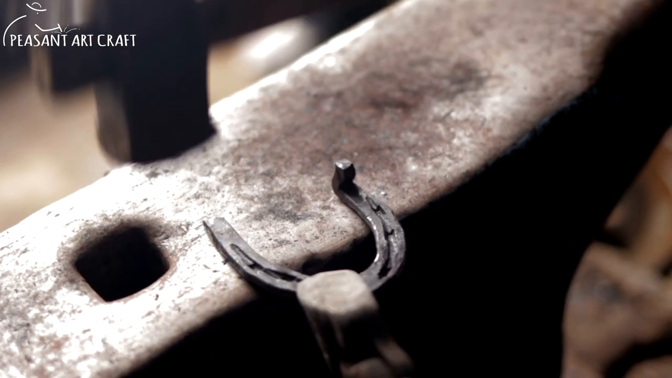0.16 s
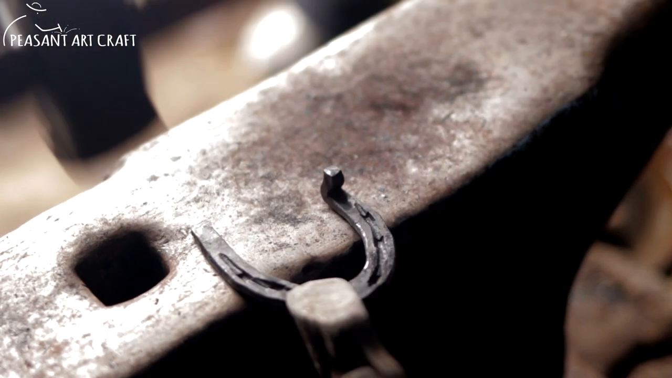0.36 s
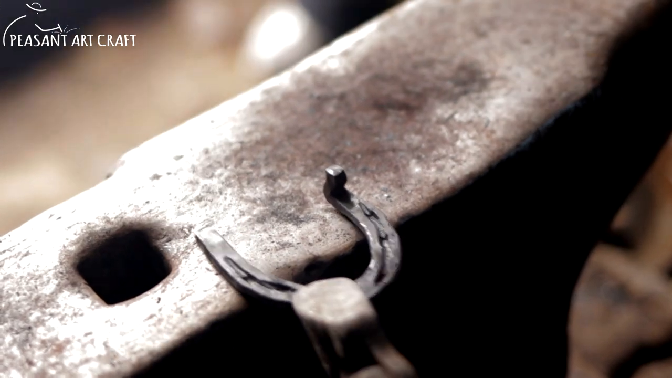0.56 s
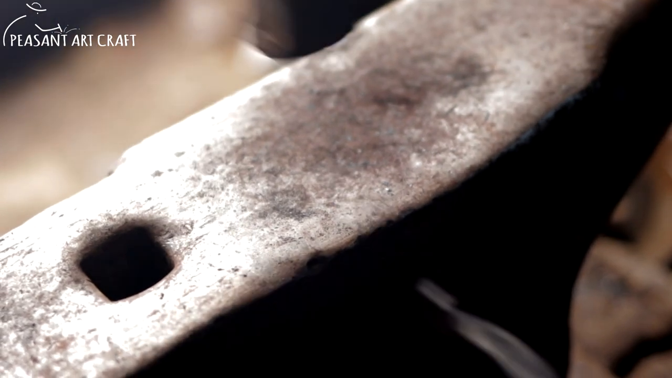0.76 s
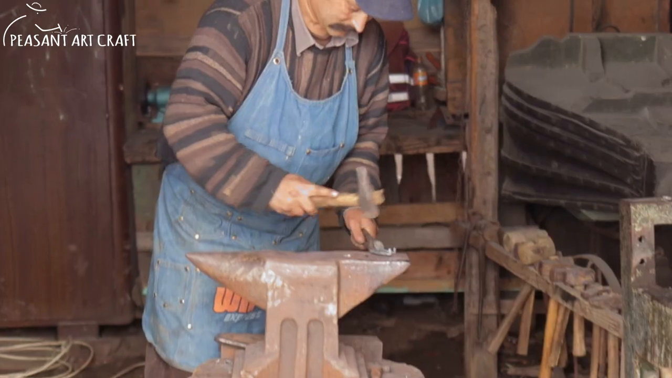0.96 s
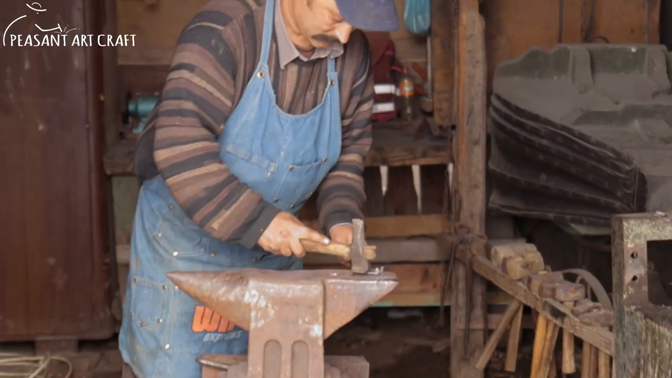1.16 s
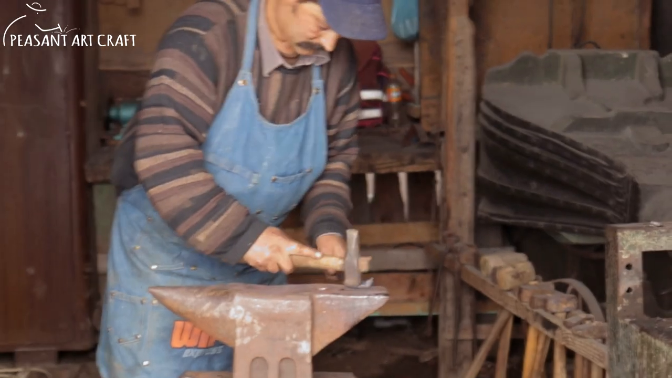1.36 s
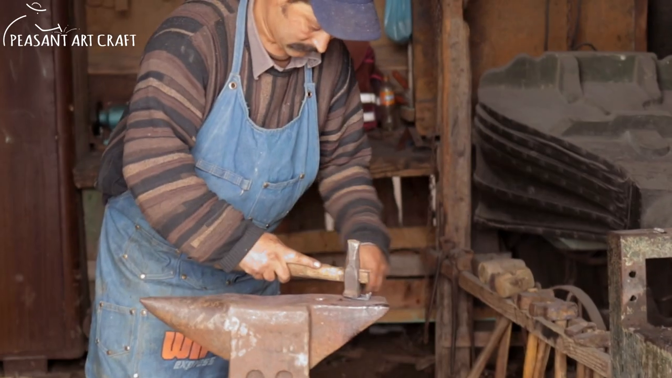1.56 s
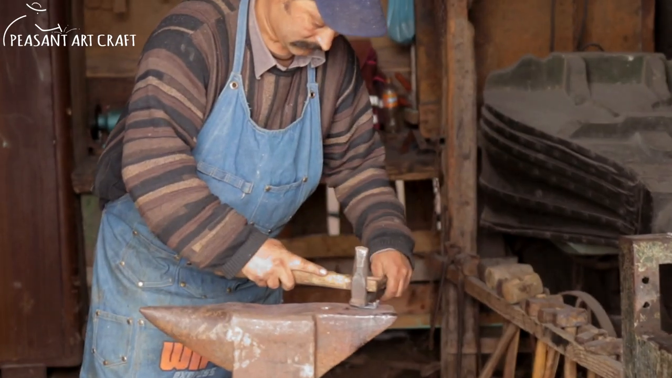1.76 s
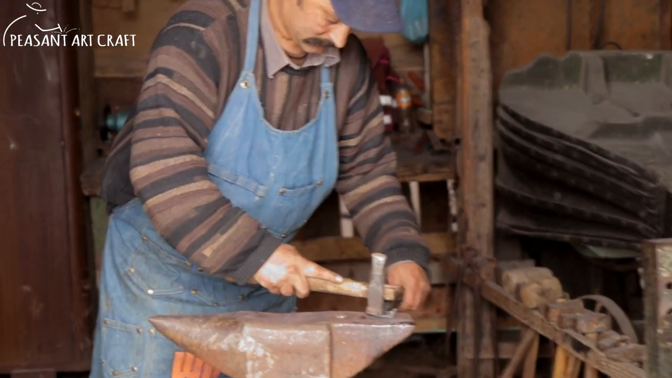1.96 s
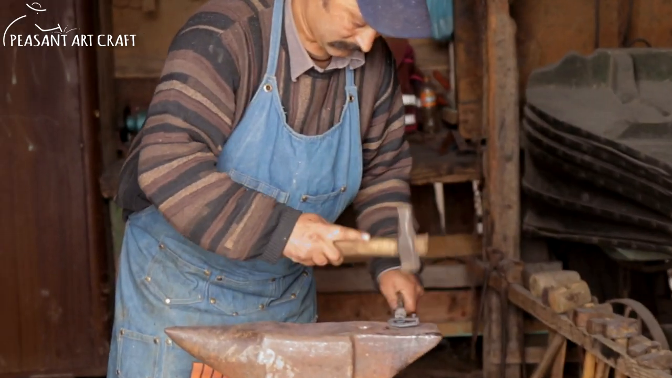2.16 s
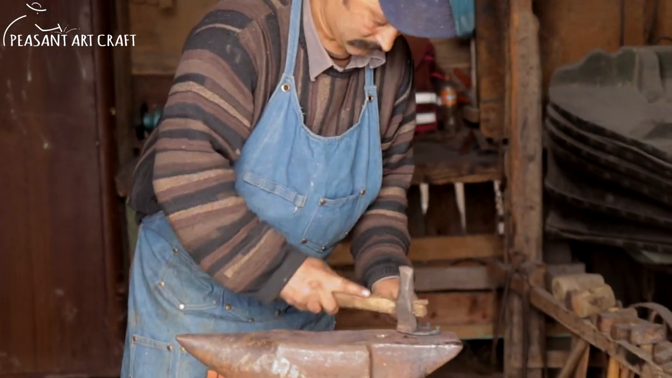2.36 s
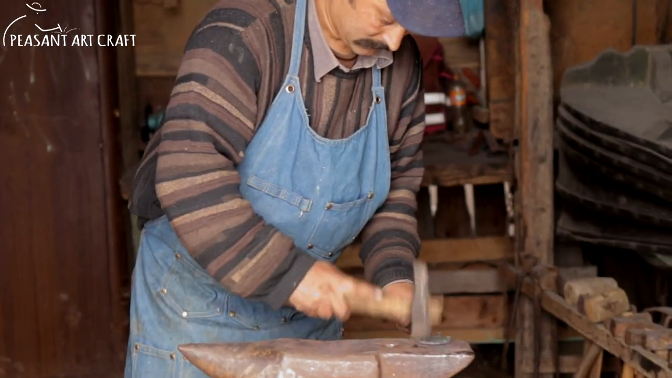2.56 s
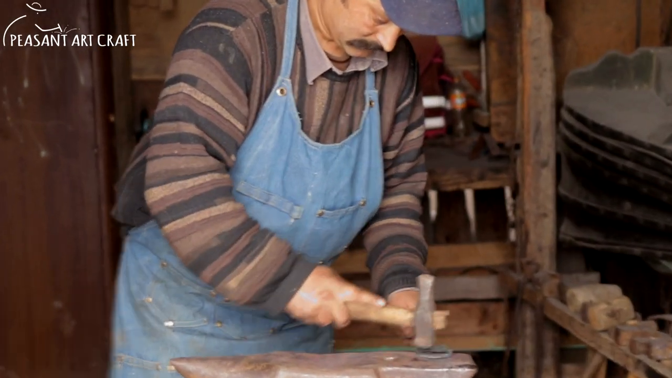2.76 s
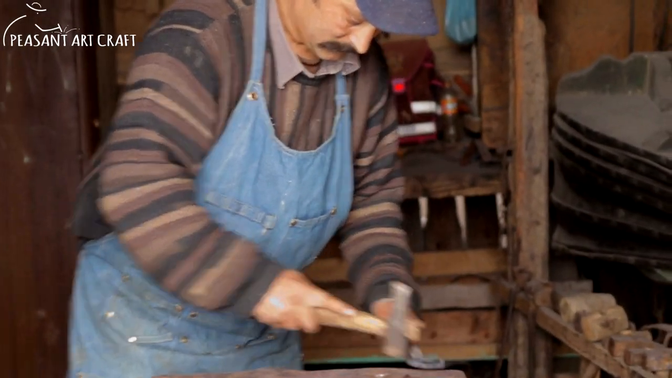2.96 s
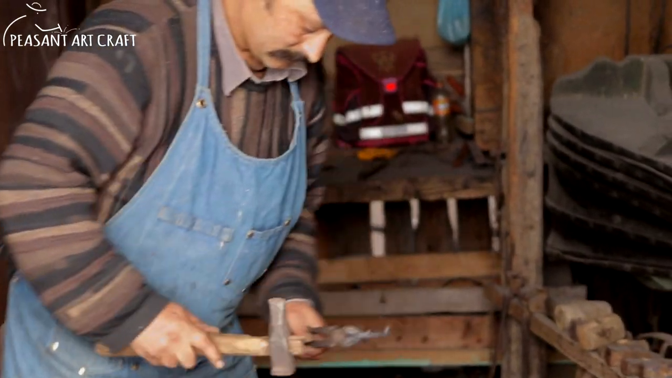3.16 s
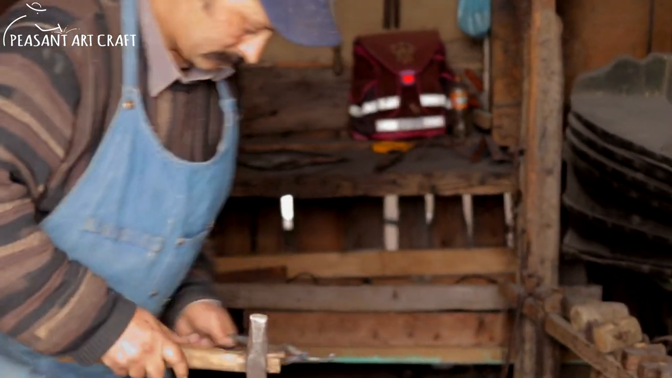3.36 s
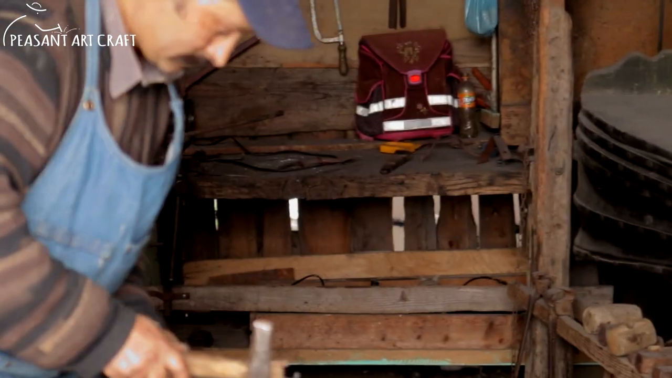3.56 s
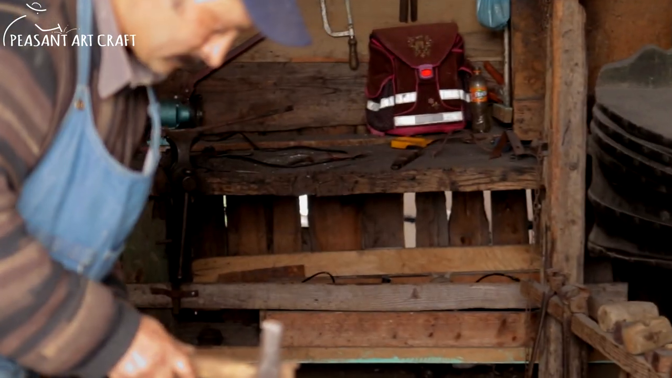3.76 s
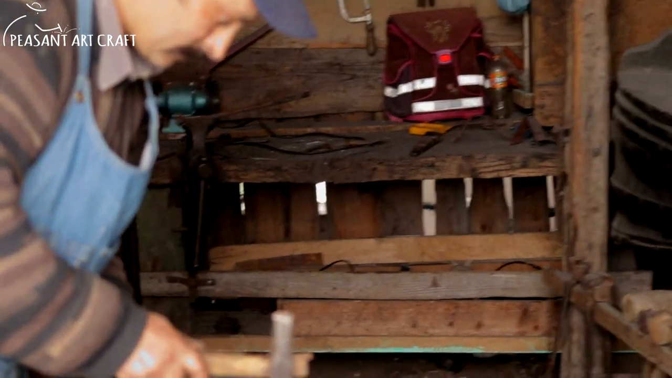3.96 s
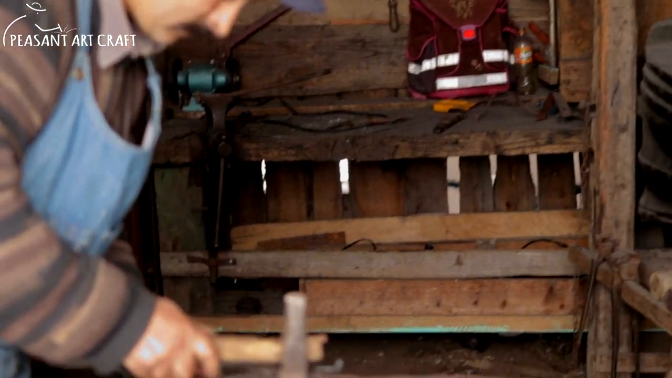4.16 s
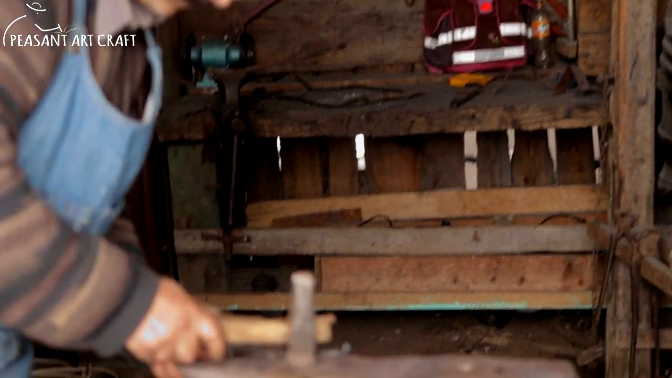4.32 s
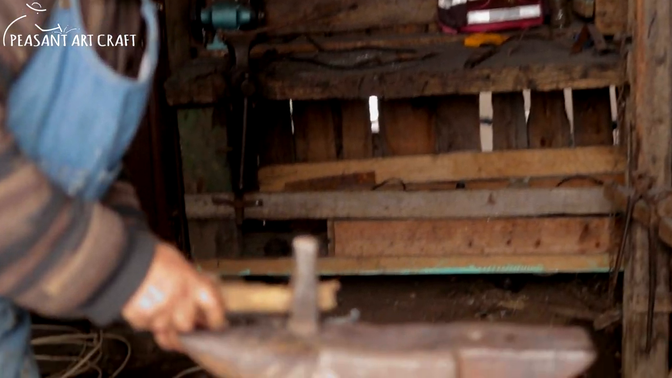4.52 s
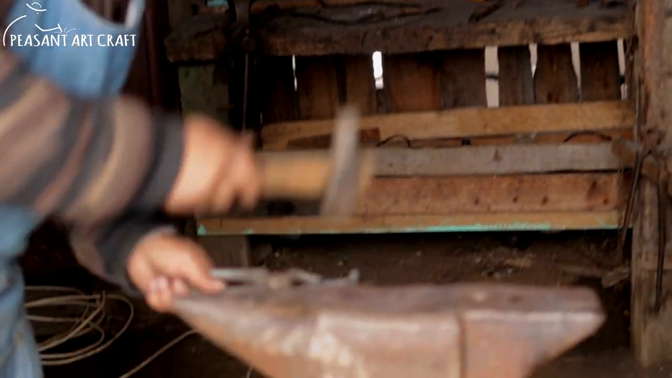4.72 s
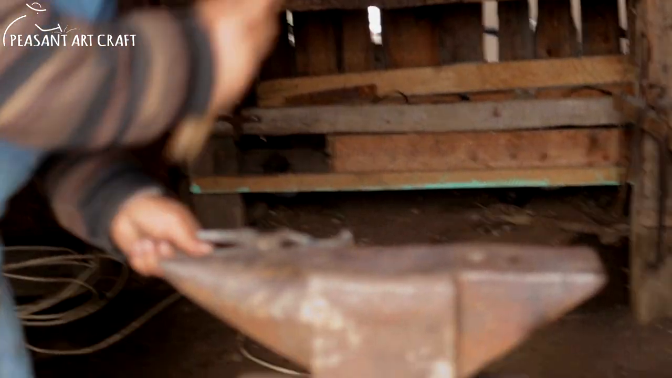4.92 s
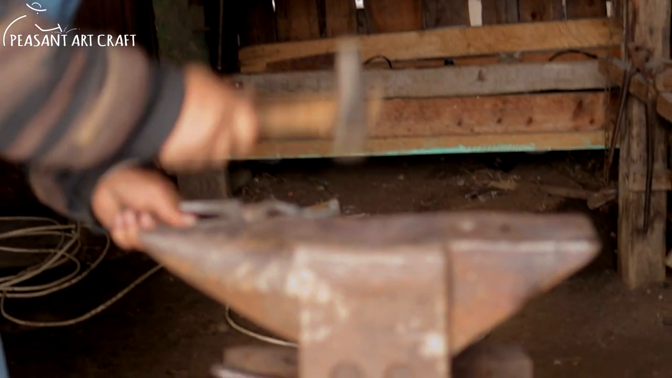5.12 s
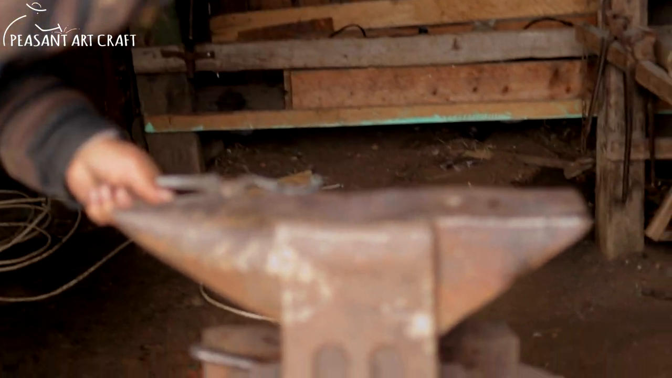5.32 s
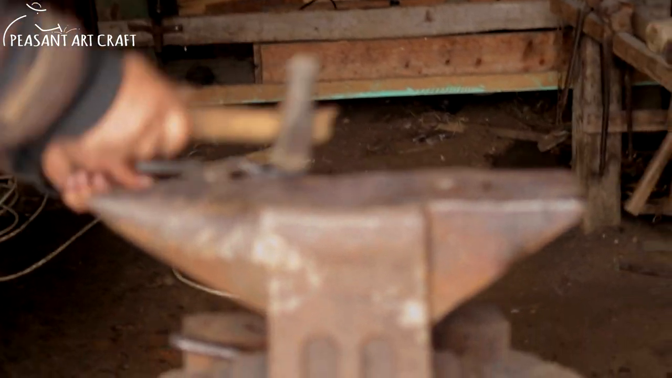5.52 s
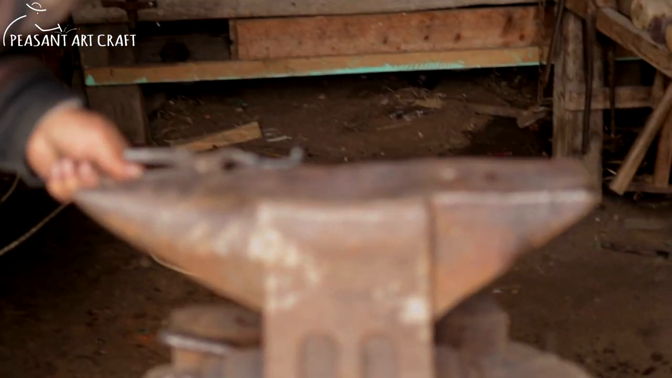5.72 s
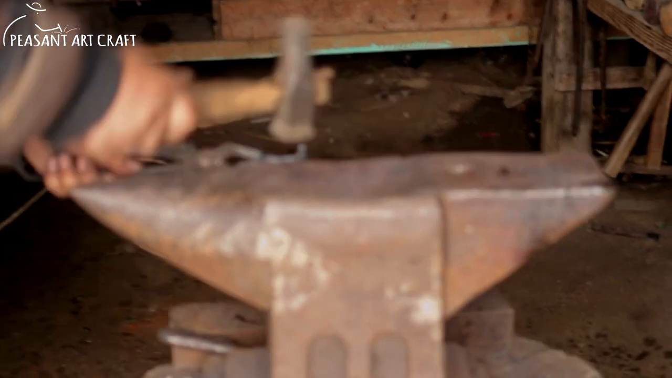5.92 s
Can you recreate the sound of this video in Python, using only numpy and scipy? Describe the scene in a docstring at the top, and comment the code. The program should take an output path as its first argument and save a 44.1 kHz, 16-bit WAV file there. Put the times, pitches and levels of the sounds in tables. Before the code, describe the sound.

Close view of a smith hammering at an anvil in a small plank shed with short, tight reflections. A ring is already dying as it starts; bright hard clangs land at 0.05 and 0.27 s, a stronger one at 0.66, then quick bounces at 0.81, 0.88 and 0.94. At about 0.95 the ring drops abruptly. Soft taps on the shoe follow at 1.15 and 1.4 with small bright ticks, then cloth rustle and a dull bump near 1.9. Firmer taps come at 2.37, a clear ringing one at 2.61, a light rattle at 2.83. At 3.16 a sharp blow bounces in accelerating, fading taps until 3.5. From 3.5 to 5 only rustling clothes, faint gritty rubbing and tiny ticks over quiet air and barely audible hum. Three very loud, slightly overloaded clangs strike at 5.03, 5.48 and 5.9, the last cut off while ringing.

```python
"""Smith at an anvil in a small wooden shed

Hard hammer blows, bounces and light taps on shoe and anvil: noise cracks, sine clanks and beating sine modes.
Tongs and shoe tick (band-passed noise), the shoe rubs (sparse grit), clothes rustle (swelling noise grains).
Quiet air and a faint hum lie beneath; planks reflect the blows, ticks and rubs. The loudest peaks flatten.
"""
import sys
import numpy as np
from scipy import signal
from scipy.fft import rfft, irfft, next_fast_len
from scipy.io import wavfile

SR = 44100
rng = np.random.default_rng(int(sys.argv[2]) if len(sys.argv) > 2 else 0)


def store_wav(level_fs):
    """Save 16-bit WAV to argv[1]."""
    pcm = np.round(np.clip(np.atleast_2d(level_fs), -1, 1) * 32767)
    wavfile.write(sys.argv[1], SR, pcm.T.astype(np.int16))


N = 263718


def amp(db):
    """dB to gain."""
    return 10 ** (np.asarray(db) / 20)


def rms_one(x):
    """Scale to rms 1."""
    return x / np.sqrt(np.mean(x ** 2) + 1e-20)


def at_hz(points, hz):
    """Interpolate a table on a log-frequency axis."""
    points = np.array(points)
    return np.interp(np.log(hz), np.log(points[:, 0]), points[:, 1])


def colour(x, spectrum_db):
    """Filter x by a spectrum in relative dB."""
    length = x.shape[-1]
    size = next_fast_len(length)
    hz = np.maximum(np.arange(size // 2 + 1) * SR / size, 1)
    return irfft(rfft(x, size) * amp(at_hz(spectrum_db, hz)), size)[..., :length]


def bandpass(x, low_hz, high_hz, order=2):
    """Butterworth band-pass."""
    return signal.sosfilt(signal.butter(order, [low_hz, high_hz], "band", fs=SR, output="sos"), x)


def stereo_noise(size, alike):
    """Two channels of white noise with correlation alike."""
    mid, side = rng.standard_normal((2, size))
    return np.sqrt((1 + alike) / 2) * mid + np.sqrt((1 - alike) / 2) * side * [[1], [-1]]


def dying(t, t60_s):
    """Exponential decay, 60 dB in t60_s."""
    return amp(-60 * t / t60_s)


def add(out, x, start_s):
    """Mix x into out at start_s; whatever falls outside out is dropped."""
    i = round(start_s * SR)
    x = x[..., max(-i, 0):]
    i = max(i, 0)
    out[..., i:i + x.shape[-1]] += x[..., :N - i]


def flicker(knots_per_s):
    """Random line through 400 knots of spread 1; the last knot then holds."""
    knots = rng.standard_normal(400)
    return np.interp(np.arange(N) / SR * knots_per_s, np.arange(400), knots)


# Decay time of the plank walls. Each row: frequency in Hz, t60 in s.
SHED_T60_S = [(60, 0.27), (250, 0.31), (600, 0.27), (1500, 0.24), (5000, 0.21), (14000, 0.16)]
SHED_EDGES_HZ = 25 * 2 ** np.arange(0, 9.6, .5)


def shed(x):
    """Diffuse reflections off plank walls: noise dying band by band, at unit energy."""
    t = np.arange(SR // 2) / SR
    white = stereo_noise(len(t), 0.82)
    tail = np.zeros_like(white)
    for low_hz, high_hz in zip(SHED_EDGES_HZ, SHED_EDGES_HZ[1:]):
        t60_s = at_hz(SHED_T60_S, np.sqrt(low_hz * high_hz))
        tail += bandpass(white, low_hz, high_hz) * dying(t, t60_s)
    tail *= np.minimum(t / 0.0024, 1)
    tail /= np.sqrt(np.sum(tail ** 2) / 2)
    return signal.fftconvolve(x[None], tail, axes=1)[:, :N]


# Spectrum of the air. Each row: frequency in Hz, relative density in dB per Hz.
AIR_SPECTRUM = [(15, -46), (25, -11), (133, -12.5), (290, -8), (401, -5.5), (1580, -10), (2130, -13),
                (3190, -16.5), (9130, -24), (13700, -30), (15600, -43)]
AIR_DB = -60
HUM_HZ, HUM_WIDTH_HZ, HUM_DB = 290, 14, -66.5


def background():
    """Quiet air as flickering noise; faint hum as narrow-band noise, which wavers."""
    air = rms_one(colour(stereo_noise(N, 0.2), AIR_SPECTRUM))
    air = air * amp(AIR_DB + 1.3 * flicker(8.1))
    half_hz = HUM_WIDTH_HZ / 2
    hum = bandpass(rng.standard_normal(N), HUM_HZ - half_hz, HUM_HZ + half_hz, order=1)
    return air + amp(HUM_DB) * rms_one(hum)


# Swells of sleeves, apron and tools; rise and fall span 20 dB. Each row: time at full level in s,
# rise in s, hold in s, fall in s, dull level in dB, bright level in dB.
RUSTLE_SWELLS = [(1.043, 0.083, 0.11, 0.054, -53, -58), (1.575, 0.45, 0.011, 0.16, -49.5, -52.5),
                 (1.775, 0.073, 0.011, 0.057, -59, -56), (1.865, 0.017, .01, 0.079, -38.5, -59.5),
                 (1.933, 0.047, .01, 0.063, -58, -50), (2.061, 0.12, 0.24, .11, -59.5, -63.5),
                 (2.58, 0.096, 0.016, .03, -47, -54.5), (3.061, 0.034, 0.11, .03, -55, -58),
                 (3.572, 0.06, 0.16, 0.078, -49.5, -57), (3.904, 0.083, .01, 0.062, -38.5, -43),
                 (4.174, .25, 0.048, 0.037, -53.5, -54.5), (4.257, .03, 0.079, .09, -68, -61),
                 (4.676, .04, .13, 0.067, -50, -53.5), (5.362, 0.077, 0.0056, 0.012, -52, -64),
                 (5.407, 0.042, 0.11, 0.028, -58.5, -64), (5.764, 0.39, 0.0041, 0.048, -52.5, -52),
                 (5.846, 0.067, 0.093, 0.036, -56.5, -64)]
# Dull and bright layer spectra. Each row: frequency in Hz, relative density in dB per Hz.
RUSTLE_DULL = [(59, -48), (100, -21.5), (295, -5), (475, -13), (855, -5.5), (1160, -12.5), (1320, -6),
               (4000, -21.5), (5200, -39.5), (8800, -120)]
RUSTLE_BRIGHT = [(1500, -10.5), (3000, 2), (5000, -3.5), (9000, -7.5), (15000, -28.5)]


def rustle():
    """Cloth and grit: dense uneven noise grains, dull and bright, under swells that rise, hold and fall."""
    full_s, rise_s, hold_s, fall_s, dull_db, bright_db = np.transpose(RUSTLE_SWELLS)[:, :, None]
    t = np.arange(N) / SR
    before = np.maximum(full_s - t, 0) / rise_s
    after = np.maximum(t - full_s - hold_s, 0) / fall_s
    swells = amp(-20 * (before + after))
    out = 0
    for level_db, spectrum in ((dull_db, RUSTLE_DULL), (bright_db, RUSTLE_BRIGHT)):
        grain_db = 4.5 * np.minimum(rng.exponential(1, N), 5.5) + 2.8 * flicker(90)
        grains = stereo_noise(N, .75) * amp(grain_db)
        out = out + np.sum(amp(level_db) * swells, axis=0) * rms_one(colour(grains, spectrum))
    return out


# Shoe rubbing along the anvil. Each row: start in s, length in s, rms level in dB, resonance in Hz.
RUBS = [(4.007, 0.27, -55.5, 1400), (4.27, .11, -64, 1750), (4.674, 0.16, -55.5, 1950)]
RUB_GRAINS_PER_S, RUB_WIDTH_HZ = 1400, 450


def rubs():
    """The shoe slides: sparse uneven grit clicks excite one broad resonance."""
    out = np.zeros(N)
    for start_s, length_s, level_db, hz in RUBS:
        size = int(length_s * SR)
        clicks = rng.random(size) < RUB_GRAINS_PER_S / SR
        grit = clicks * rng.standard_normal(size) * np.hanning(size) ** .25
        rub = bandpass(grit, hz - RUB_WIDTH_HZ / 2, hz + RUB_WIDTH_HZ / 2)
        add(out, amp(level_db) * rms_one(rub), start_s)
    return out + amp(-4.5) * shed(out)


# Small ticks of tongs and shoe. Each row: start in s, peak level in dB before reflections, pitch in Hz.
TICKS = [(.512, -42.5, 2130), (1.102, -33, 595), (1.152, -13, 5100), (1.404, -30, 4080), (1.419, -19, 9500),
         (1.437, -28, 9400), (1.454, -25, 8250), (1.769, -35, 1260), (1.855, -31, 304), (1.858, -32.5, 800),
         (1.874, -25, 754), (2.857, -17.5, 3870), (2.961, -39.5, 1100), (3.067, -42.5, 2480),
         (3.088, -43, 2230), (3.122, -37.5, 3200), (4.007, -41, 1343), (4.104, -39.5, 2240),
         (4.118, -40, 2810), (4.217, -35.5, 2200), (4.342, -43, 3140), (4.459, -48.5, 1600),
         (4.58, -38.5, 1376), (4.68, -32, 1470), (5.367, -40.5, 1283), (5.404, -43.5, 1330),
         (5.82, -48.5, 694), (5.833, -37, 8500)]


def ticks():
    """Small bodies knock: short dying noise, band-passed around one pitch."""
    t = np.arange(2000) / SR
    out = np.zeros(N)
    for start_s, peak_db, hz in TICKS:
        burst = rng.standard_normal(len(t)) * dying(t, .018)
        knock = bandpass(burst, hz / 1.35, hz * 1.35)
        add(out, amp(peak_db) * knock / np.max(np.abs(knock)), start_s)
    return out + amp(-2) * shed(out)


# Anvil modes, grouped by the spots that excite them. Each row: frequency in Hz, level in dB within the family,
# t60 in s at ring length factor 1, response to lean. Response x lean below zero cuts the mode by twice that in dB.
MODE_FAMILIES = [
    [(2539, -1, .21, 1), (2553, -2, .21, -.5), (3045, -22, .22, 0)],
    [(3290, -1, .22, 1), (3311, -1, .24, -.7)],
    [(3762, -1, .42, 1), (3768, -1, .26, -1), (8285, -9, .26, 3)],
    [(3942, 0, .22, 0)],
    [(4517, 0, .25, 0)],
    [(5366, 0, .32, 0), (11565, -4, .25, 0), (14135, -9, .3, 0), (14975, -10, .25, 0)],
    [(5652, 0, .68, 4), (5647, -1, .3, -2)],
    [(6460, 0, .28, 0), (8060, -11, .2, 2)],
    [(6700, 0, .26, 0), (6648, -2, .18, 0)],
    [(7706, 0, .36, 0), (9280, -14, .18, -2)],
    [(9428, 0, .25, 0), (10440, -13, .18, 0), (12880, -12, .19, 0), (13430, -13, .22, 0)],
]
MODE_SCATTER_DB = 0.5   # no two blows strike the modes alike


def ring(t, family_db, bright_db_per_oct, length_factor, lean_db, until_s):
    """Anvil modes ring as dying sines, each with its own phase step and balance; the next contact stills them."""
    rows = []
    for k, family in enumerate(MODE_FAMILIES):
        for hz, db, t60_s, twin in family:
            rows.append((hz, db + family_db[k] + min(twin * lean_db * 2, 0), t60_s, k, twin))
    hz, db, t60_s, family, twin = np.array(rows).T[:, :, None]
    db = db + bright_db_per_oct * np.log2(hz / hz[0]) + rng.normal(0, MODE_SCATTER_DB, db.shape)
    level = amp(db) * dying(t, t60_s * length_factor) * (1 - np.exp(-t / 0.0046))
    level = level * dying(np.maximum(t - until_s, 0), 0.033)
    # one phase per family; twins start opposed and beat
    start_phase = rng.uniform(0, 2 * np.pi, len(MODE_FAMILIES))[family.astype(int)] + np.pi * (twin < 0)
    phase = 2 * np.pi * hz * t + start_phase
    # high modes reach the two channels further out of step, the more so at positive lean
    lead_rad = np.minimum((.55 + .08 * max(lean_db, 0)) * (hz / 7200) ** 3, 1.3)
    lead_rad = lead_rad + rng.normal(0, .3, db.shape)
    pan_db = rng.normal(0, 1.2, db.shape)
    left, right = (np.sum(level * amp(side * pan_db) * np.sin(phase + side * lead_rad), axis=0)
                   for side in (1, -1))
    return np.array([left, right])


# Spectra of the crack, of the stump under the anvil and of the shock through the floor.
# Each row: frequency in Hz, relative density in dB per Hz.
CRACK_SPECTRUM = [(80, -39.5), (250, -9.5), (700, -19), (1200, -10), (1550, -2), (2100, -14.5),
                  (2700, -6.5), (4200, -13.5), (6600, -15), (10000, -15), (15600, -28.5)]
STUMP_SPECTRUM = [(70, -25), (130, -8), (175, -5.5), (210, -12), (255, 2), (320, -2), (600, -7),
                  (1200, -26.5)]
FLOOR_SPECTRUM = [(20, -4.5), (60, -5), (130, -7.5), (300, -31)]
# Modes of the hammer head. Each row: frequency in Hz, level in dB before the chink gain, t60 in s.
HAMMER_HEAD = [(3511, -7.5, 0.021), (6260, -4.5, 0.014), (9210, -8.5, 0.027), (12560, -16, 0.013)]
SNAP_T60_S, CLANK_T60_S, THUD_T60_S = 0.001, 0.031, 0.17


def impact(t, crack_db, thud_db, boom_db, sizzle_db, clank_hz, clank_db, chink_db, crack_t60_s):
    """Steel on steel: noise crack, sine chink of the hammer head, sine clank, noise thud of stump and floor."""
    white = rng.standard_normal((3, len(t)))
    tilt = [(4000, 0), (12000, sizzle_db + 9.0)]
    fall = dying(t, crack_t60_s) + 0.5 * dying(t, SNAP_T60_S)
    crack = rms_one(colour(colour(white[0], CRACK_SPECTRUM), tilt)) * fall
    chink = 0
    for hz, db, t60_s in HAMMER_HEAD:
        chink = chink + amp(db + rng.normal(0, 1.3)) * np.sin(2 * np.pi * hz * t) * dying(t, t60_s)
    clank = amp(clank_db + 5) * np.sin(2 * np.pi * clank_hz * t) * dying(t, CLANK_T60_S)
    steel = amp(crack_db - 6.5) * (crack + amp(chink_db) * chink) + clank
    # small bodies radiate no bass
    steel = signal.sosfilt(signal.butter(3, 210, "high", fs=SR, output="sos"), steel)
    stump = amp(thud_db) * rms_one(colour(white[1], STUMP_SPECTRUM))
    floor = amp(boom_db) * rms_one(colour(white[2], FLOOR_SPECTRUM))
    return steel + (stump + floor) * dying(t, THUD_T60_S) * (1 - np.exp(-t / 0.00074))


# Hammer blows, levels before the fixed trims in impact(). Each row: start in s, spot, crack level in dB,
# thud level in dB, clank level in dB, ring level in dB, ring brightness in dB per octave.
BLOWS = [ (-0.18, "by the hole", 5, -29.5, -9, -3.5, 2), (0.0466, "by the hole", 5, -24.5, -7.5, -5.5, -4),
         (0.269, "by the hole", 6, -24, -6.5, -5.5, -1.5), (0.663, "bare face", 11.5, -23, -14, -3, -0.4),
         (0.811, "face, bouncing", 10.5, -28.5, -37, -6, 3.5),
         (0.88, "face, bouncing", 8, -25, -22, -9.5, 4.5),
         (0.94, "face, bouncing", 6.5, -47, -10.5, -16, 6.5), (1.146, "shoe", -12.5, -27, -37, -28.5, 2),
         (1.375, "shoe, rattling", -15.5, -28.5, -29.5, -37.5, 7.5),
         (2.368, "shoe", -4, -26.5, -8.5, -23, 2.5), (2.612, "shoe, square", -2, -34, -16, -6.5, -1),
         (2.834, "shoe, rattling", -12.5, -29, -19.5, -33, 1.5), (3.157, "edge", 4, -45, -10, -16.5, -2.5),
         (3.258, "edge, bouncing", -1, -37, -42, -13, 6),
         (3.337, "edge, bouncing", -5, -37.5, -46, -13, 2.5),
         (3.401, "edge, bouncing", -7, -37, -55, -12, -7),
         (3.452, "edge, bouncing", -14, -54, -38, -17.5, -4.5),
         (3.484, "edge, bouncing", -21, -41, -31.5, -18.5, -6),
         (3.511, "edge, bouncing", -18, -38.5, -45, -23.5, -3), (5.03, "far end", 16, -20, 1.5, 4, -3),
         (5.479, "far end", 15.5, -20.5, -1.5, 5, -3), (5.901, "far end", 16.5, -13, 1, 6, 0.5)]
# Where the hammer lands. Each spot: (treble tilt of the crack in dB before a 9 dB lift, clank in Hz,
# ring length factor, lean in dB, chink gain in dB, crack t60 in s), then (level in dB of mode families 0 to 10).
SPOTS = { "by the hole": ((-21, 1463, 0.7063, -3, -1.5, 0.0269),
         (1.5, -16, -19, -2, -19.5, -9, -9, -13, -12, -14.5, -15)),
         "bare face": ((-8, 1586.5, 1.01, -1.5, -2, .025),
         (1, -15, -21, -3.5, -24.5, -8.5, -9, -3, -7, 2.5, -10)),
         "face, bouncing": ((-18.5, 1537, 0.87, -1, 1.6, 0.0178),
         (1.5, -17, -10.5, -5.5, -10, -22, -20, -12, -10.5, -8.5, -26)),
         "shoe, rattling": ((3, 1677, 1.26, -8, -4.5, 0.12),
         (0, -5, -20, -7, -24, -17, -19, -10, -12, -21, -15)), "shoe": ((-15, 1617, 0.8, 1, -4, 0.0148),
         (0, -8, -26, -7, -6, -9, -18, -18, -9, -13, -14)),
         "shoe, square": ((-21.5, 1678.5, 1.02, -3, -6, 0.09),
         (-3.5, -11.5, -35.5, -18.5, -20.5, -15.5, -10, -22, -17, -27, -12)),
         "edge": ((-10.5, 1562, 1.1, -7, 3, 0.0576),
         (-12, -23, -7.5, 0, -10.5, -23, -29.5, -21.5, -2.5, 4, 4.5)),
         "edge, bouncing": ((-24.5, 1495, 0.87, -3.5, 2, 0.0383),
         (-4.5, -2, -15, -16.5, -24, -38, -17.5, -16, -16, -11.5, -18)),
         "far end": ((-14, 1338, 1, 3, -3, .025),
         (-4.5, -6, -8, -13, -32, -31, -11, -6.5, -8.5, -15.5, -14)), }
BOOM_DB = -49   # floor shock re the crack column
DUCK_S, DUCK_DB = .955, -15   # blows before DUCK_S are suddenly turned down while they still ring


def blows():
    """Hammer on anvil, dry and in the shed: the spot sets the colour, the swing sets the strength."""
    t = np.arange(int(.6 * SR)) / SR
    hits = np.zeros((2, N))   # early, late
    rings = np.zeros((2, 2, N))   # early or late, channel, sample
    gaps_s = np.diff([row[0] for row in BLOWS], append=N / SR)
    for blow, gap_s in zip(BLOWS, gaps_s):
        start_s, spot, crack_db, thud_db, clank_db, ring_db, bright_db_per_oct = blow
        settings, family_db = SPOTS[spot]
        sizzle_db, clank_hz, length_factor, lean_db, chink_db, crack_t60_s = settings
        late = int(start_s > DUCK_S)
        hit = impact(t[:SR // 4], crack_db, thud_db, crack_db + BOOM_DB, sizzle_db,
                     clank_hz, clank_db, chink_db, crack_t60_s)
        add(hits[late], hit, start_s)
        tone = ring(t, ring_db + np.array(family_db), bright_db_per_oct, length_factor, lean_db, gap_s)
        add(rings[late], tone, start_s)
    early, late = (hit + amp(-3.5) * shed(hit) + tone + amp(-9.5) * shed(tone[0])
                   for hit, tone in zip(hits, rings))
    duck = np.where(np.arange(N) < DUCK_S * SR, 1, amp(DUCK_DB))
    return early * duck + late


def scene():
    """All sources summed, background first."""
    return background() + rustle() + rubs() + ticks() + blows()


STOPBAND_HZ, STOPBAND_DB = 16100, 40


def record(dry):
    """Overload squashes peaks near and above full scale; a steep low-pass cuts the top treble."""
    flat = dry / (1 + np.abs(dry / 1.06) ** 14.0) ** (1 / 16.0)
    return signal.sosfilt(signal.cheby2(12, STOPBAND_DB, STOPBAND_HZ, fs=SR, output="sos"), flat)


dry = scene()
out = record(dry)
store_wav(out)
```